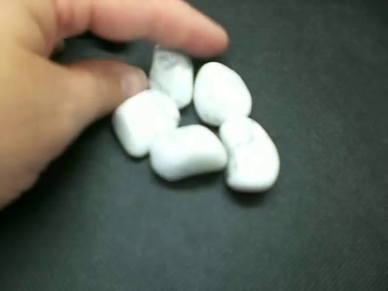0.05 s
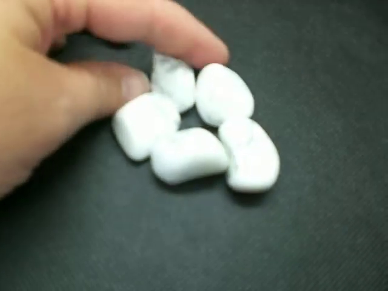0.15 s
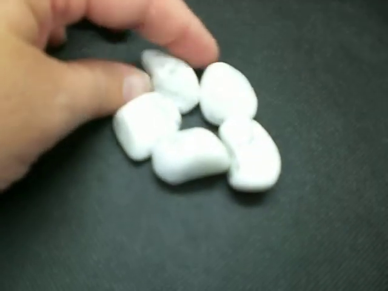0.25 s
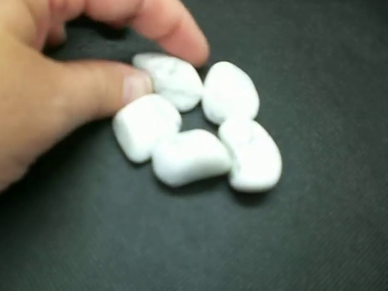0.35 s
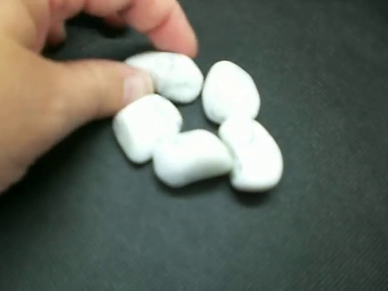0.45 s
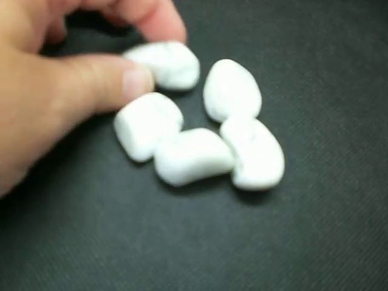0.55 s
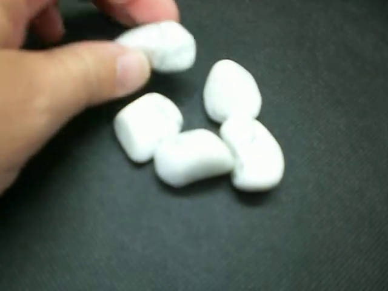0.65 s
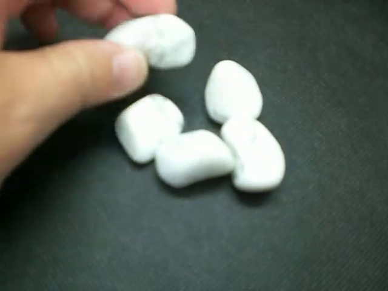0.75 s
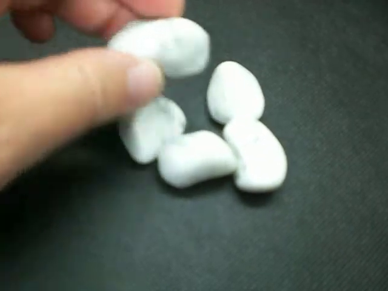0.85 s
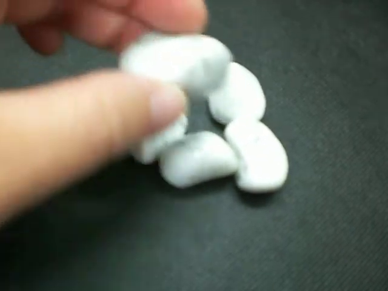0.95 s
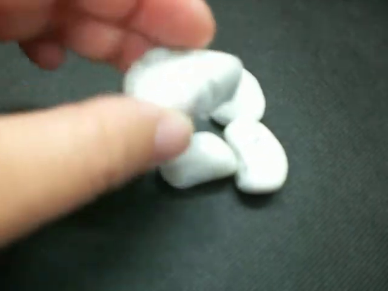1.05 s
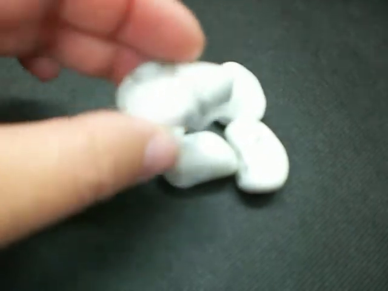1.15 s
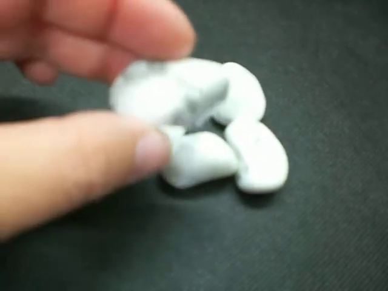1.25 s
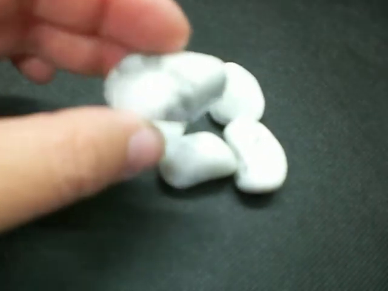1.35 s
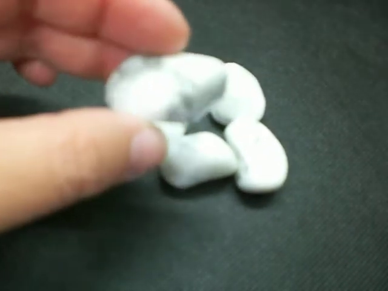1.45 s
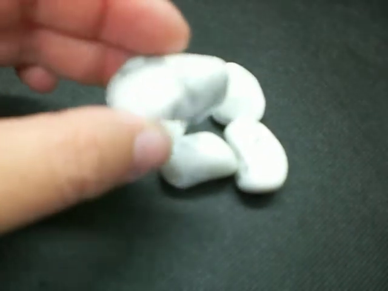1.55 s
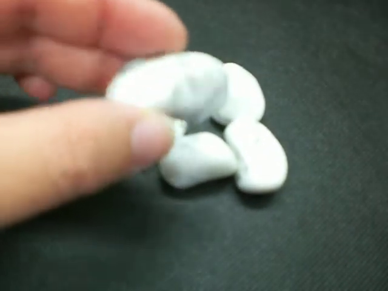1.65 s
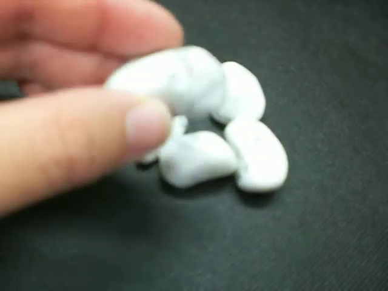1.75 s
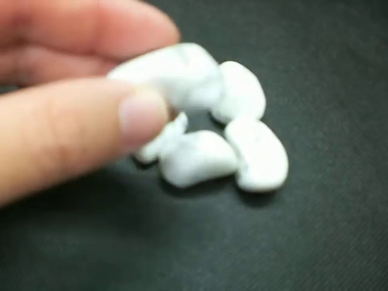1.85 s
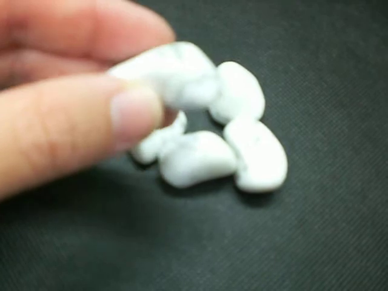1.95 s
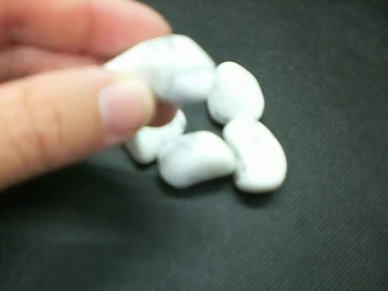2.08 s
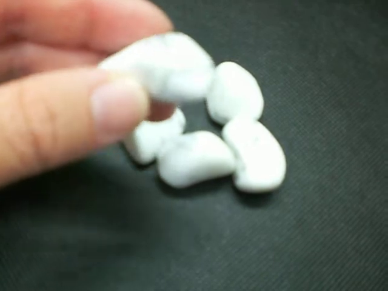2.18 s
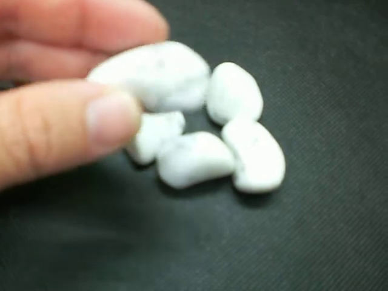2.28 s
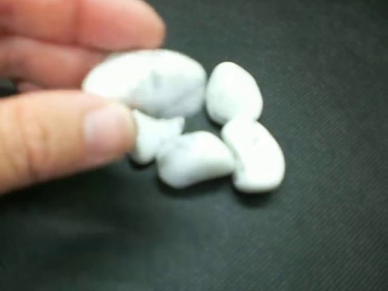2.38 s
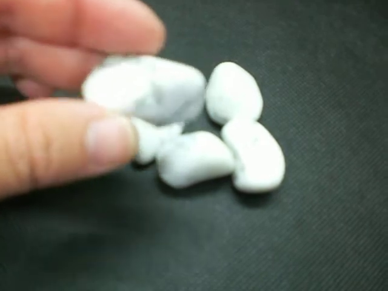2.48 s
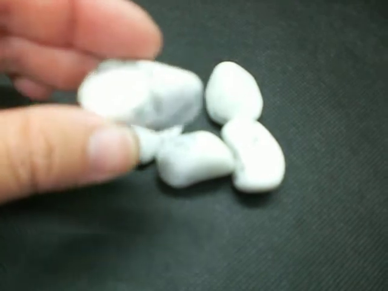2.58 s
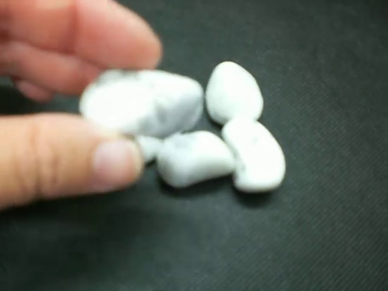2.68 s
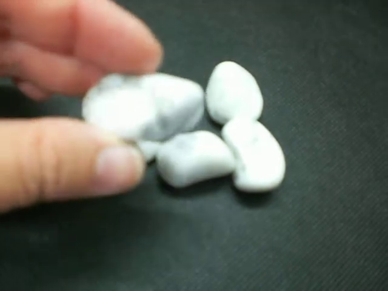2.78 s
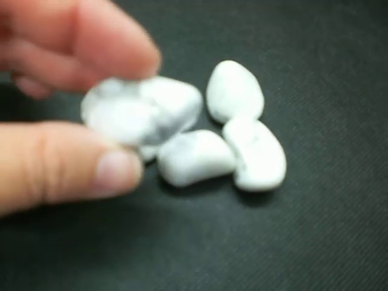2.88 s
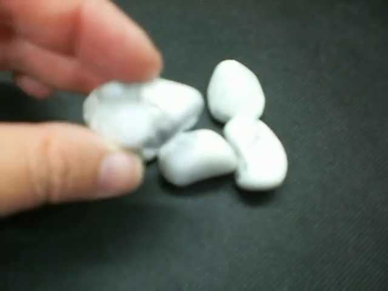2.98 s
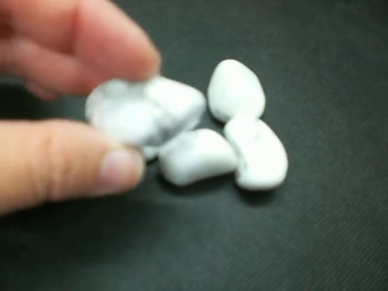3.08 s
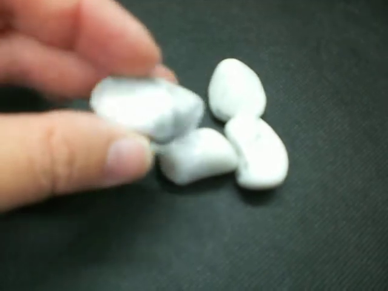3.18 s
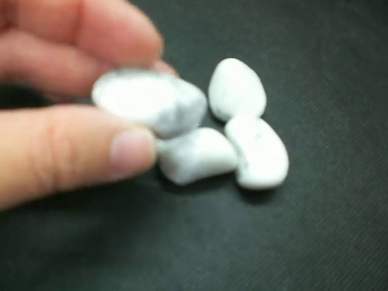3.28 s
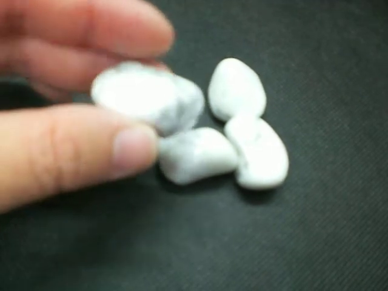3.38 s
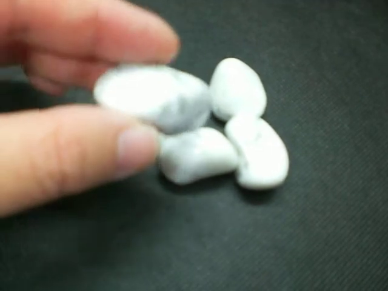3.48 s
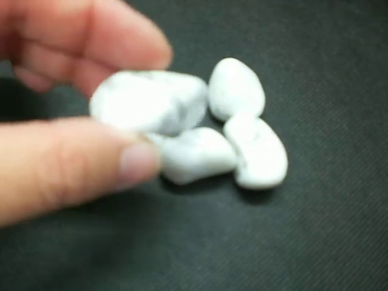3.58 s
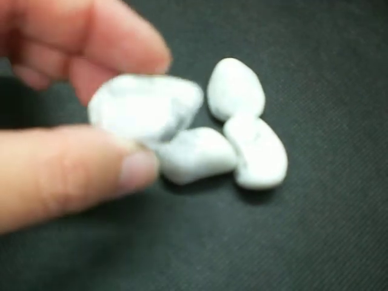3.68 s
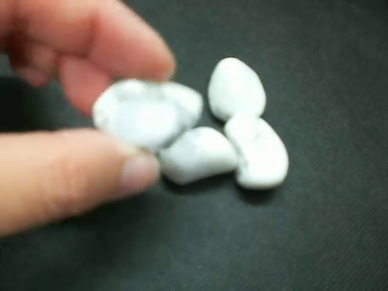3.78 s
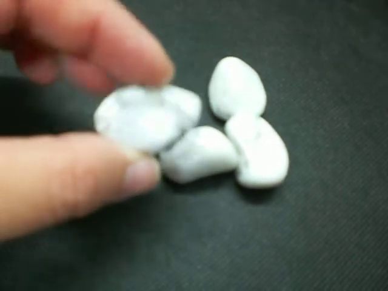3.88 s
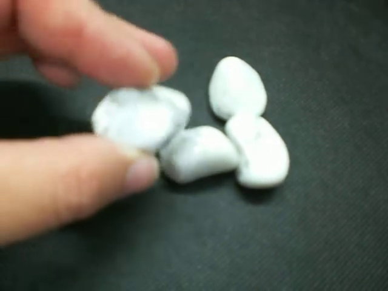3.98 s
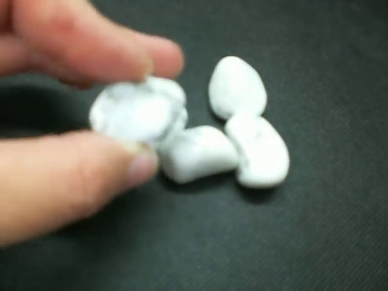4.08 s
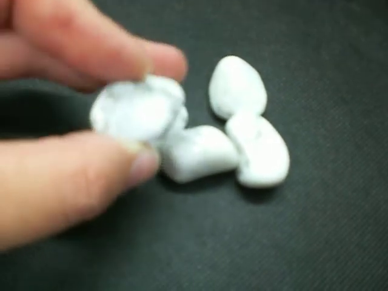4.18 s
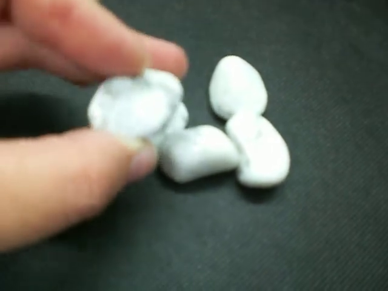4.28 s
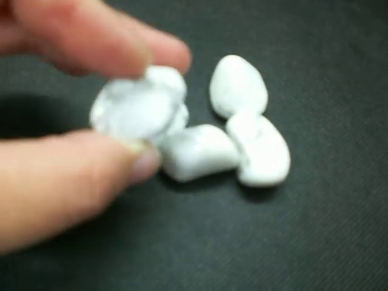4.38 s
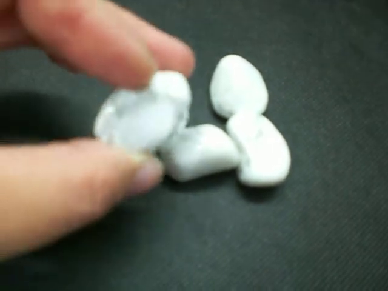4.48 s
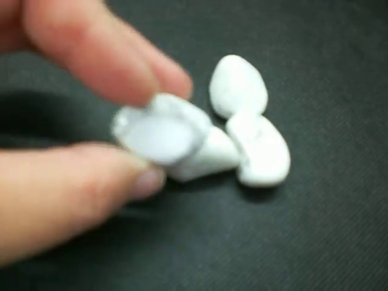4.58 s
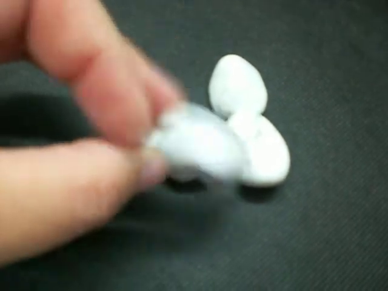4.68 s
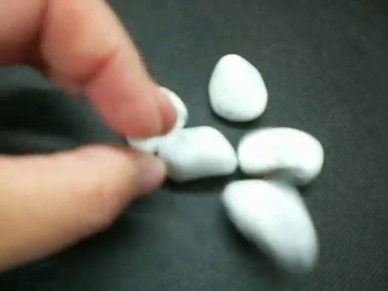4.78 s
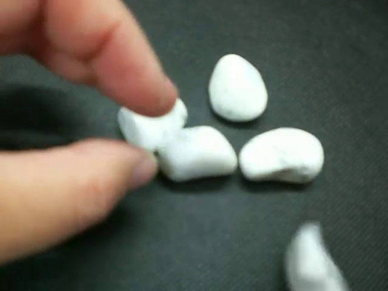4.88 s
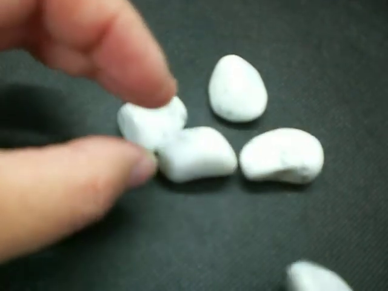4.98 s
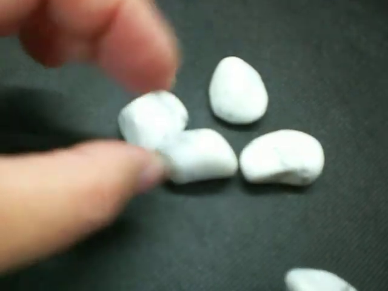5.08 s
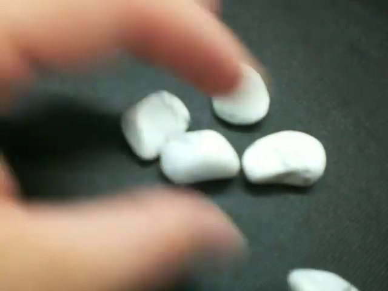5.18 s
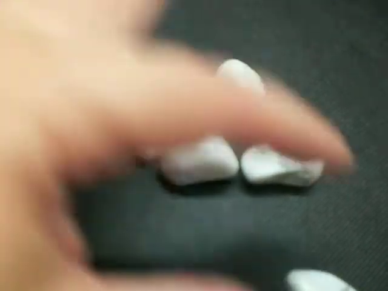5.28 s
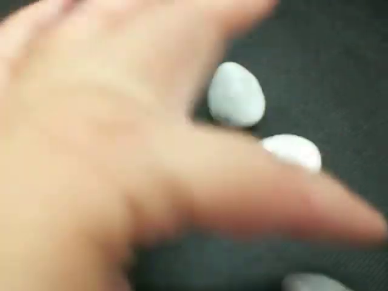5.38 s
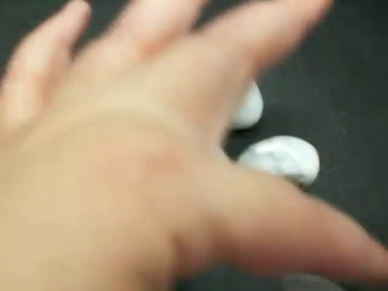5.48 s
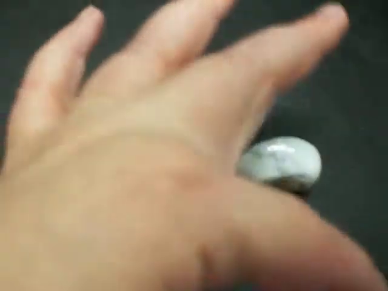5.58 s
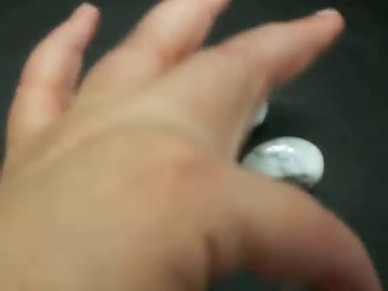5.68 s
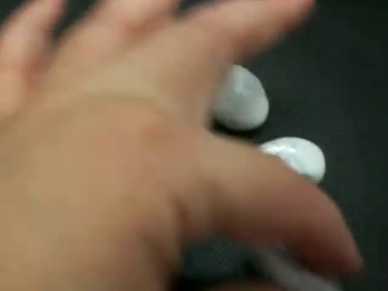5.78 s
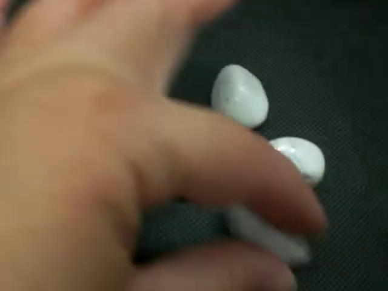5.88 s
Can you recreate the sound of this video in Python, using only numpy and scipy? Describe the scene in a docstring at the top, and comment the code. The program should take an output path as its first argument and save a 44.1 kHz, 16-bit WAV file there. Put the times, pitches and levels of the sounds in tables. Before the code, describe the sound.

A hand shifts small polished stones on a cloth-covered table, close to the microphone. A few light clicks come first, then soft rubbing of skin on stone and cloth. Near the end one stone slips, cracks sharply against its neighbour and tumbles with quick, hollow knocks on the table top. A few tiny scrapes follow as the hand closes. Birds call faintly outside over a steady room hiss.

```python
"""Polished stones click together as a hand shifts them on a cloth-covered table, close to the microphone.
Skin rubs on stone and cloth over a steady room hiss, and birds call faintly outside.
Near the end one stone slips, cracks against its neighbour and tumbles, making the table top boom.
Then the hand closes on the stones with a few tiny scrapes."""
import sys
import numpy as np
from scipy import signal
from scipy.fft import rfft, irfft
from scipy.io import wavfile
from scipy.ndimage import uniform_filter1d

SR = 44100
rng = np.random.default_rng(int(sys.argv[2]) if len(sys.argv) > 2 else 0)


def persist_wave(psi):
    """Save psi, clipped to +-1, as 16-bit WAV."""
    counts = np.round(np.clip(psi, -1, 1) * 32767).astype(np.int16)
    wavfile.write(sys.argv[1], SR, np.atleast_2d(counts).T)


N = 261954
TREBLE_LIMIT_HZ = 16080


def amp(db):
    """Turns decibels into a factor to multiply by."""
    return 10 ** (np.asarray(db) / 20)


def unit_rms(x):
    """Scales a sound so that its average power is 1."""
    return x / np.sqrt(np.mean(x ** 2) + 1e-20)


def unit_energy(x):
    """Scales a sound so that its total energy is 1."""
    return x / (np.linalg.norm(x) + 1e-12)


def seconds(length):
    """The time of each sample, in seconds."""
    return np.arange(int(length * SR)) / SR


def fade(t, ring_s):
    """Dies away by 60 dB in ring_s seconds, the ring time."""
    return np.exp(-np.log(1000) * t / ring_s)


def add(mix, start, sound):
    """Mixes a sound in, beginning at start seconds."""
    part = mix[max(round(start * SR), 0):][:len(sound)]
    part += sound[:len(part)]


def coloured(x, points):
    """Shapes bass and treble along a curve of (Hz, dB) points, then sets the average power to 1."""
    hz, db = np.transpose(points)
    bins_hz = np.fft.rfftfreq(len(x), 1 / SR)
    curve_db = np.interp(np.log(bins_hz + 1), np.log(hz + 1), db)
    return unit_rms(irfft(rfft(x) * amp(curve_db), len(x)))


def filtered(x, hz, kind, order=2):
    """Keeps what lies below ("low") or above ("high") hz; a higher order cuts more steeply."""
    return signal.sosfilt(signal.butter(order, hz, kind, fs=SR, output="sos"), x)


def ring(tones, t):
    """The fading tones of something struck; neighbouring tones swing in opposite directions."""
    return sum((-1) ** k * amp(db) * fade(t, ring_s) * np.sin(2 * np.pi * hz * t)
               for k, (hz, db, ring_s) in enumerate(tones))


def surroundings(x):
    """The direct sound plus the short ringing of the close surroundings."""
    # Each row: pitch of a resonance in Hz, its width in Hz, its level in dB.
    resonances = [(2670, 33, 2.5), (4060, 110, -5.5), (4670, 140, -3.5), (5150, 150, -4), (6170, 480, -6),
                  (6990, 150, 2.5), (8290, 200, 1), (9360, 160, -1), (10370, 170, -14), (11900, 250, -5),
                  (13180, 240, 0.5), (13800, 250, 6)]
    return x + sum(amp(db) * signal.lfilter(*signal.iirpeak(hz, hz / width, fs=SR), x)
                   for hz, width, db in resonances)


def room_hiss():
    """Steady room noise with a thin electrical whine."""
    # Each row: frequency in Hz, relative level in dB.
    hiss_colour = [(15, -27), (28, -1), (53, -6.5), (144, -1), (250, 0), (450, -3), (1400, -10),
                   (2330, -12.5), (4700, -16), (6600, -17), (7500, -21.5), (8700, -18), (15800, -20)]
    hiss_db, whine_db, whine_hz = -58, -81, 14508
    hiss = coloured(rng.standard_normal(N), hiss_colour)
    whine = np.sqrt(2) * np.sin(2 * np.pi * whine_hz * np.arange(N) / SR)
    return amp(hiss_db) * hiss + amp(whine_db) * whine


def bird_note(length, db, start_hz, end_hz):
    """A whistle blurred by many echoes on its way in; the further it glides, the more it warbles."""
    t, tail = seconds(length), seconds(0.3)
    warble_hz, glide_share = 75, 0.18
    warble_depth = glide_share * np.log(start_hz / end_hz)
    warble = warble_depth * np.sin(2 * np.pi * (warble_hz * t + rng.random()))
    hz = np.geomspace(start_hz, end_hz, len(t)) * (1 + warble)
    note = np.sin(2 * np.pi * np.cumsum(hz) / SR) * signal.windows.tukey(len(t), 0.2)
    echoes = rng.standard_normal(len(tail)) * fade(tail, ring_s=0.28)
    return amp(db) * np.sqrt(len(t)) * unit_energy(signal.fftconvolve(note, echoes))


def birds():
    """Outside, one bird chirps and twitters in falling notes, another whistles, and there are low coos."""
    # Each row: start in seconds, length in seconds, level in dB.
    chirps = [(0.368, .085, -61), (2.053, 0.084, -60.5), (4.01, .115, -61), (4.666, 0.073, -58.5)]
    # Runs of three quick notes. Each row: start in seconds, level in dB.
    twitters = [(1.031, -66.5), (2.72, -57.5), (5.215, -59.5)]
    # The dB added to each note of a run; the middle one is strongest.
    accents_db = [-1, 1, -3.5]
    # Each row: start in seconds, length in seconds, level in dB, first and last pitch in Hz.
    whistles = [(2.621, 0.11, -72, 2400, 2390), (2.91, 0.025, -63, 2790, 2390),
                (3.091, 0.1, -68, 2307, 2284)]
    # Dove-like notes. Each row: start in seconds, length in seconds, level in dB, pitch in Hz.
    coos = [(4.309, 0.05, -65, 550), (4.374, 0.073, -59, 563), (4.58, 0.19, -61.5, 549),
            (5.003, 0.072, -66, 553), (5.299, 0.048, -63, 537.5), (5.43, 0.08, -66, 517)]
    note_s, step_s, step_down_hz = 0.043, 0.072, 402  # within a twitter
    out = np.zeros(N)
    for start, length, db in chirps:
        add(out, start, bird_note(length, db, start_hz=4550, end_hz=2858))
    for start, db in twitters:
        for k, accent_db in enumerate(accents_db):
            note = bird_note(note_s, db + accent_db, start_hz=6050 - k * step_down_hz, end_hz=3650)
            add(out, start + k * step_s, note)
    for start, length, db, start_hz, end_hz in whistles:
        add(out, start, bird_note(length, db, start_hz, end_hz))
    for start, length, db, hz in coos:
        add(out, start, bird_note(length, db, hz, hz))
    return out


def rubbing():
    """Skin rubs, dull on stone and brighter on cloth; each stroke swells as it presses, then fades."""
    # Each row: moment of firmest pressure, swell time and fade time (all in seconds),
    # level in dB, share of cloth hiss from 0 to 1.
    strokes = [(0.01, 0.025, 0.1, -57, 0.35), (0.27, 0.21, 0.094, -60.5, .2),
               (0.42, 0.05, 0.069, -56.5, .03), (0.6, 0.079, 0.04, -55.5, 0.2),
               (0.8, 0.15, 0.26, -53.5, 0.88), (2.997, 0.017, 0.026, -56, .4), (4.02, .012, .015, -60, .7),
               (5.735, 0.19, 0.14, -53, 0.78), (5.92, 0.17, 0.089, -55.5, 0.18)]
    # Skin on stone. Each row: frequency in Hz, relative level in dB.
    skin_colour = [(120, -12), (260, 3.5), (500, 0), (1200, -1), (2000, 1), (2600, -0.5), (4500, -2),
                   (6500, -14), (8000, -16), (16000, -24)]
    # Skin on cloth, with the same columns.
    cloth_colour = [(200, -6), (1500, -6.5), (4500, -3), (6500, -5), (7700, -9), (10000, -6), (16000, -8.5)]
    drop_db, roundness = 10.5, 1.33  # drop after one swell or fade time; 1 = pointed top, 2 = round
    t = np.arange(N) / SR
    # From 1.3 to 3 seconds the fingers softly turn a lifted stone, away from the cloth.
    turning = uniform_filter1d(1.0 * ((t > 1.3) & (t < 3)), size=8000)
    stone_power, cloth_power = (amp(-73) * turning) ** 2, np.zeros(N)
    for peak_s, swell_s, fade_s, db, cloth_share in strokes:
        from_peak = np.maximum((peak_s - t) / swell_s, (t - peak_s) / fade_s)
        power = amp(db - np.minimum(drop_db * from_peak ** roundness, 100)) ** 2
        stone_power += power * (1 - cloth_share)
        cloth_power += power * cloth_share
    flicker = amp(1.2 * unit_rms(uniform_filter1d(rng.standard_normal(N), size=260)))
    skin = coloured(surroundings(flicker * rng.standard_normal(N)), skin_colour)
    cloth = coloured(surroundings(flicker * rng.standard_normal(N)), cloth_colour)
    return np.sqrt(stone_power) * skin + np.sqrt(cloth_power) * cloth


def scrapes():
    """Gripped stones stick and slip in a short, gritty buzz that also rings the hollow of the hand."""
    # Each row: start in seconds, length in seconds, level in dB, slips a second, roughness from 0 to 1.
    grips = [(5.7536, 0.0022, -34.5, 1700, 0.88), (5.7606, 0.0016, -24.5, 1900, 0.99),
             (5.784, 0.0066, -45.5, 1510, 0.22), (5.808, 0.0083, -42.5, 1480, 0.18)]
    # A rough scrape. Each row: frequency in Hz, relative level in dB.
    grit_colour = [(200, -13), (900, -9.5), (1550, 3.5), (2200, 7.5), (2700, 3), (3100, 1), (4600, 0),
                   (6000, -7), (8000, -8), (10500, 7), (16000, -0.5)]
    # An evenly slipping scrape, with the same columns.
    slip_colour = [(1500, -1.5), (3000, 2), (4500, 5.5), (6000, -5), (16000, -14)]
    # Each row: pitch in Hz, level in dB, ring time in seconds.
    hand_tones = [(309, 2.5, 0.072), (1100, 8, 0.041)]
    out, t = np.zeros(N), seconds(0.08)
    for start, length, db, slip_hz, rough in grips:
        jitter = 0.025 * unit_rms(uniform_filter1d(rng.standard_normal(len(t)), size=40))
        cycles = np.cumsum(slip_hz * (1 + jitter)) / SR
        slips = sum(np.cos(2 * np.pi * k * cycles) for k in range(1, int(TREBLE_LIMIT_HZ / slip_hz)))
        grit = coloured(rng.choice([-1.0, 1.0], len(t)), grit_colour)
        contact = fade(np.maximum(t - length, 0), 0.023)
        buzz = contact * (np.sqrt(rough) * grit + np.sqrt(1 - rough) * coloured(slips, slip_colour))
        hollow = ring(hand_tones, t) * (1 - fade(t, 0.011)) * (1 - rough)
        add(out, start, amp(db) * (buzz + hollow))
    return out


def table_booms():
    """The tumbling stone sets off the table top's own tones and a haze of crowded higher ones."""
    # Each row: start in seconds, force in dB, treble cutoff in Hz (low when the cloth cushions
    # the blow), pitch in Hz that the landing spot brings out.
    blows = [(4.7187, 0.5, 2700, 1240), (4.7339, 5, 105, 350), (4.737, -8, 148, 660),
             (4.7458, 8.5, 68, 135), (4.78, 4.5, 68, 333), (4.7937, 2.5, 69, 223), (4.8327, 2, 51, 227),
             (4.9016, 8, 48, 283), (4.912, -8, 45, 276)]
    # Each row: pitch in Hz, level in dB, ring time in seconds.
    table_tones = [(87, -44.5, 0.15), (129.6, -32.5, 0.13), (171.7, -37, 0.22), (221.1, -26, 0.18),
                   (279.6, -31, 0.24), (325.3, -39, 0.24), (376, -25, 0.073), (459.7, -31.5, 0.17),
                   (497.5, -35, 0.17), (592, -40, .07), (636, -19, 0.035), (719, -29, .106),
                   (768, -30.5, .076), (875, -31, 0.17), (965, -26.5, 0.081), (1268, -20.5, 0.041),
                   (1298, -27.5, 0.047), (1425, -42, .09), (1690, -28, 0.042), (1876, -20.5, 0.033),
                   (2330, -20, 0.024), (2650, -21, 0.026)]
    out, t = np.zeros(N), seconds(0.6)
    haze_level = amp(-26) * fade(t, 0.068) + amp(-40.5) * fade(t, 0.32)
    for start, db, cutoff_hz, spot_hz in blows:
        # Tones that swing most at the landing spot gain up to 6 dB.
        tones = [(hz, tone_db + 6 * np.exp(-(np.log(hz / spot_hz) / 0.18) ** 2), ring_s)
                 for hz, tone_db, ring_s in table_tones]
        haze = filtered(rng.standard_normal(len(t)), 3000, "low", order=4)
        haze = unit_rms(filtered(haze, 400, "high"))
        blow = ring(tones, t) + haze * haze_level
        add(out, start, amp(db) * filtered(blow, cutoff_hz, "low", order=1))
    # The board gives off almost nothing below its lowest tone.
    return filtered(out, 70, "high", order=3)


def stone_clicks():
    """Stone hits stone: a sharp pulse and brief chatter, then close echoes and a weak room tail."""
    # Each row: start in seconds, level in dB, centre pitch in Hz, ring time of the echoes in seconds.
    hits = [(0.0968, -22.5, 3380, 0.03), (0.1224, -12, 5750, 0.049), (0.1625, -12.5, 6400, 0.034),
            (0.1778, -26, 5400, .035), (4.719, 11.5, 9700, 0.039), (4.7638, -1.5, 7750, .033),
            (4.7844, -25, 6000, .04), (4.793, -27, 4000, .046), (4.8343, -33, 2700, .07),
            (4.9023, -24, 2350, 0.041)]
    out, t = np.zeros(N), seconds(0.25)
    for start, db, centre_hz, ring_s in hits:
        chatter, near, far = rng.choice([-1.0, 1.0], (3, len(t)))
        pulse = amp(-2.5) * unit_energy(chatter * fade(t, 0.0075) * (t > 0))
        pulse[0] = 1  # the first contact
        # Cloth and skin take some treble from each echo.
        echoes = filtered(near, 11600, "low", order=1) * fade(t, ring_s) * (1 - fade(t, 0.0023))
        room_tail = filtered(far, 7000, "low", order=1) * fade(t, 0.25)
        echo_db = 3 - 6 * np.log2(centre_hz / 6000)  # duller clicks have stronger echoes
        click = pulse + amp(echo_db) * unit_energy(echoes) + amp(-24.5) * unit_energy(room_tail)
        # Small stones give off little bass, and the time they stay in contact limits the treble.
        click = filtered(surroundings(click), centre_hz / 1.78, "high")
        click = filtered(click, centre_hz * 1.73, "low", order=3)
        add(out, start, amp(db) * unit_energy(click))
    return out


def scene():
    """Stones, table, hand, birds and room, mixed into one channel."""
    return (stone_clicks() + table_booms() + scrapes() + rubbing() + birds() + room_hiss())[None]


def record(dry):
    """Clips any peak beyond full scale, then removes the very highest treble."""
    treble_cut = signal.firwin(511, TREBLE_LIMIT_HZ, window=("kaiser", 9), fs=SR)
    return signal.oaconvolve(np.clip(dry, -1, 1), treble_cut[None], "same")


dry = scene()
out = record(dry)
persist_wave(out)
```